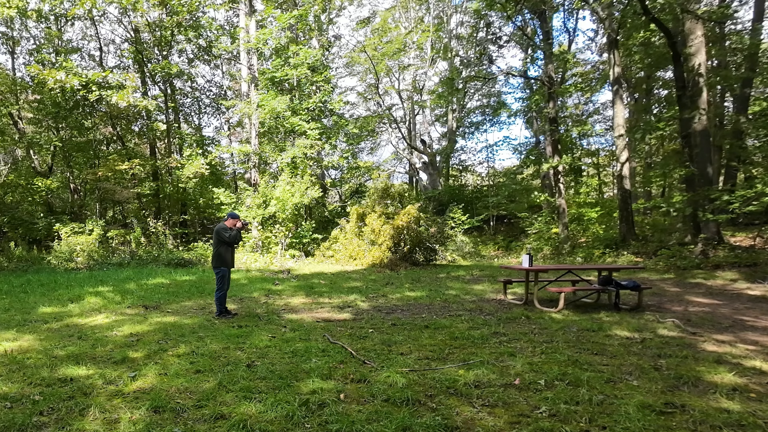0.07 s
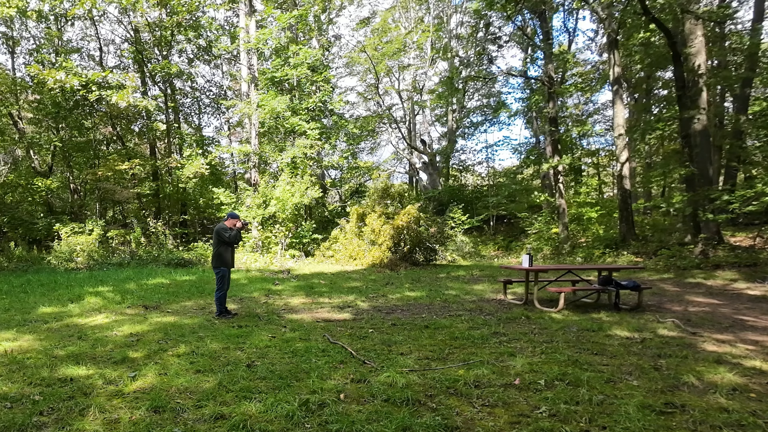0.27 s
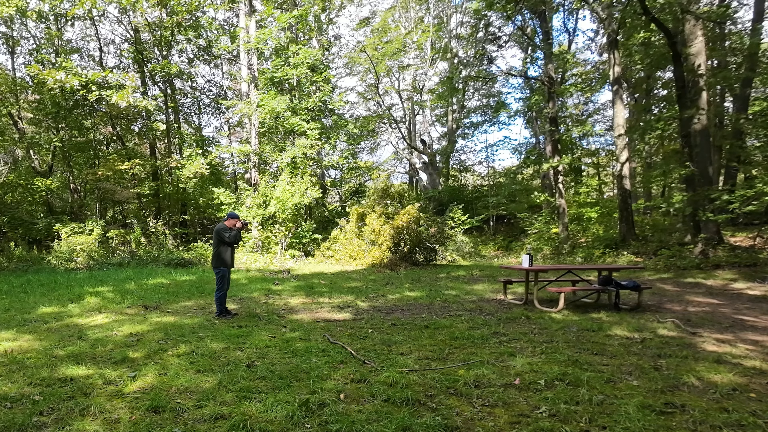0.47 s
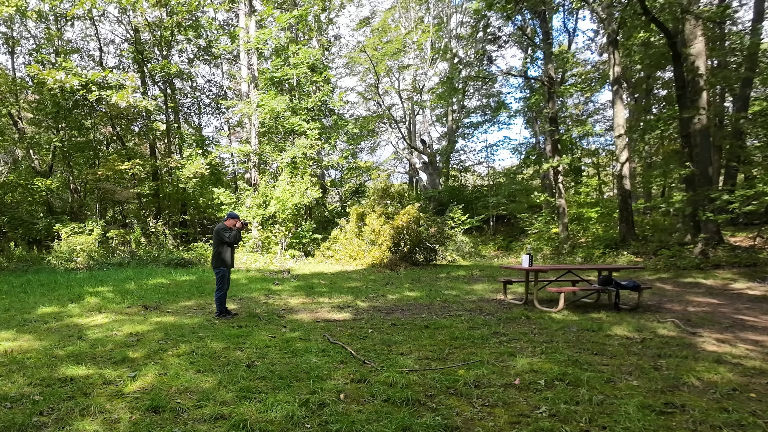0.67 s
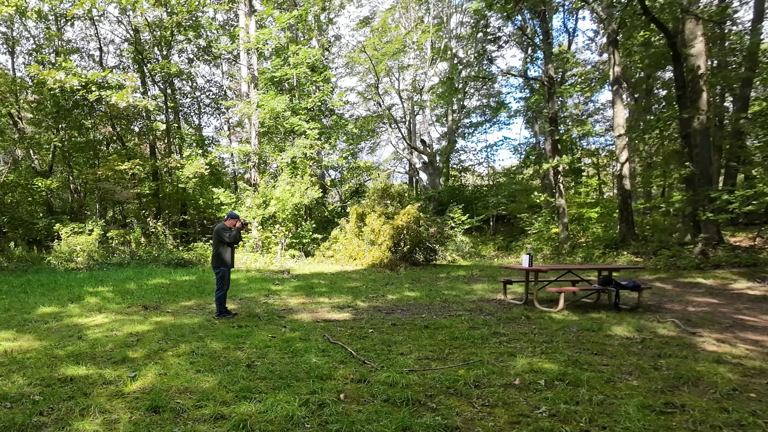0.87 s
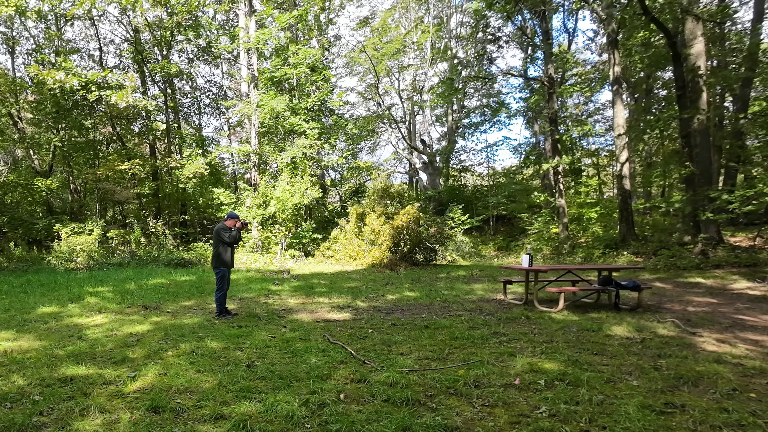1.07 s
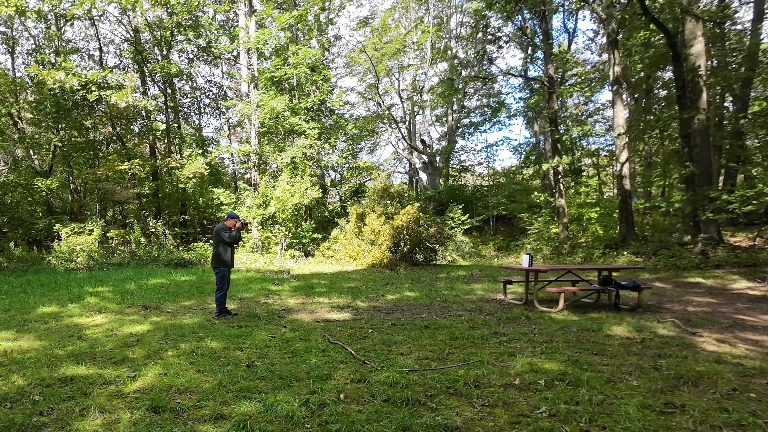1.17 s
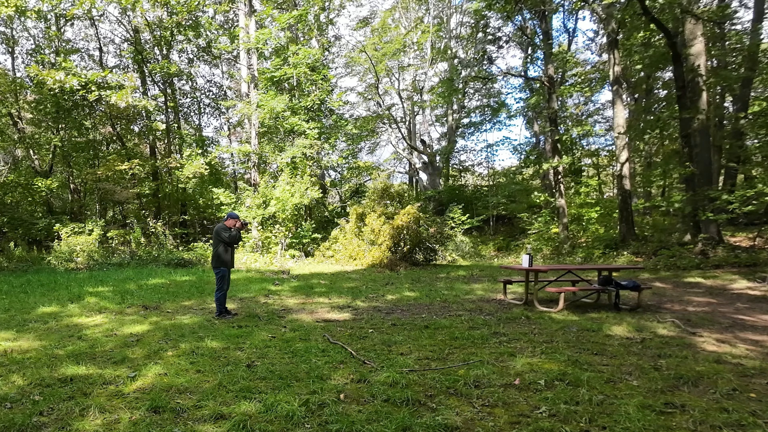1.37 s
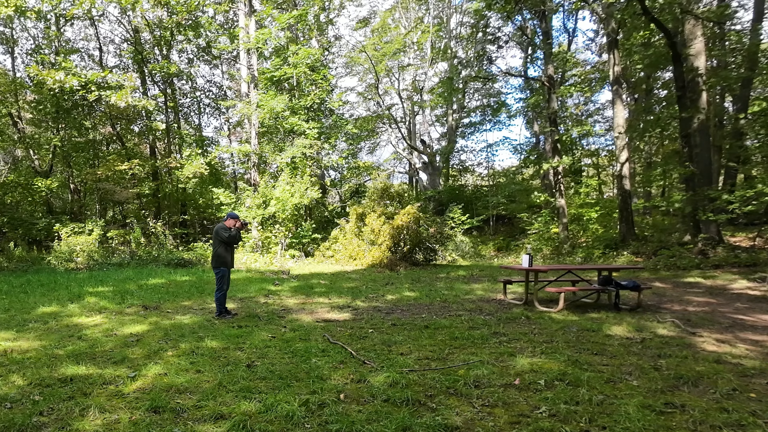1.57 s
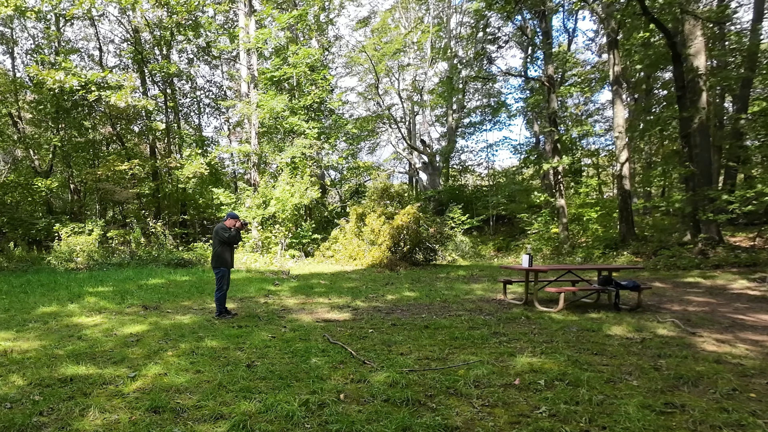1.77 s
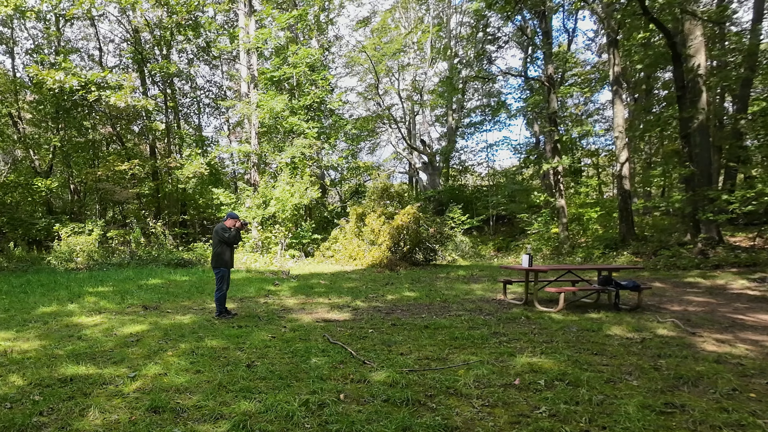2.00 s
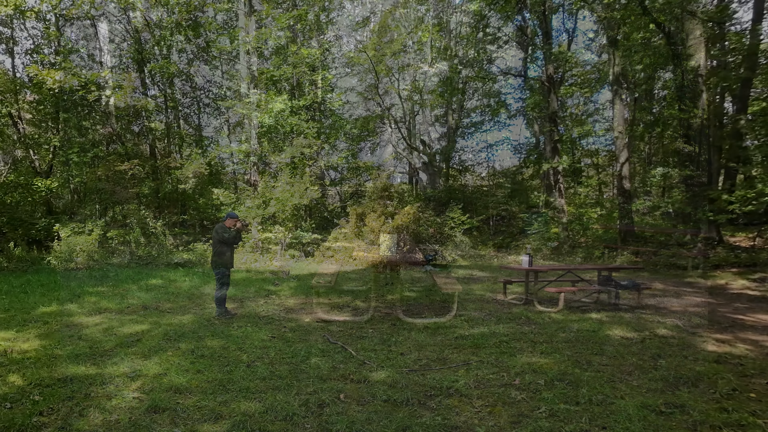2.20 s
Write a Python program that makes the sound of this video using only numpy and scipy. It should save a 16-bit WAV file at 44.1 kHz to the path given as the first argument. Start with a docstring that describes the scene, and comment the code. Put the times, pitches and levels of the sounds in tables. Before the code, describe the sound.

A reflex camera takes one picture with a quick two-part mechanical clack in a quiet clearing

```python
"""A quiet forest clearing under a low, barely wavering hush of air; early on, one faint tick in the undergrowth.
Then a reflex camera takes one picture: the mirror swings up, the shutter curtains snap, and the mirror rattles
back down. Gears are random ticks, impacts are puffs of noise, some led by very high treble, and the body rings
in decaying sines. The ground scatters the sound at once and the trees answer late and faintly; a soft low double
bump closes. An inverted reflection about a millisecond late at the microphone makes everything slightly hollow."""
import sys
import numpy as np
from scipy import signal
from scipy.fft import rfft, irfft, next_fast_len
from scipy.io import wavfile
from scipy.ndimage import map_coordinates

SR = 44100
rng = np.random.default_rng(int(sys.argv[2]) if len(sys.argv) > 2 else 0)


def to_wav(s):
    """Save 16-bit WAV."""
    ch = np.atleast_2d(s).T  # columns
    pcm = np.round(np.clip(ch, -1, 1) * 32767)  # PCM
    wavfile.write(sys.argv[1], SR, pcm.astype(np.int16))


N = 98695  # samples, about 2.24 s
ATTACK_S, SOFT_ATTACK_S = 0.00029, 0.00065  # rise of sharp ticks and snaps; of thuds, ringing and bumps


def amp(db):
    """Decibels to gain."""
    return 10 ** (np.asarray(db) / 20)


def unit(x):
    """Scale to rms 1."""
    return x / np.sqrt(np.mean(x ** 2) + 1e-20)


def along(points, hz):
    """Read (f/Hz, value) points on a log frequency axis."""
    f, v = np.transpose(points)
    return np.interp(np.log(hz + 1), np.log(f + 1), v)


def filtered(x, response):
    """Filter x by a complex response of frequency, padded to at least twice its length."""
    size = next_fast_len(2 * len(x))
    spectrum = rfft(x, size) * response(np.fft.rfftfreq(size, 1 / SR))
    return irfft(spectrum, size)[:len(x)]


def noise(colour, size):
    """Random-phase noise of rms 1; the colour sets only its relative spectrum."""
    hz = np.fft.rfftfreq(size, 1 / SR)
    phase = np.exp(2j * np.pi * rng.random(len(hz)))
    return unit(irfft(amp(along(colour, hz)) * phase, size))


def envelope(t, attack, t60):
    """A quick rise times an exponential fall of 60 dB in t60 seconds."""
    return (1 - np.exp(-t / attack)) * np.exp(-np.log(1000) * t / t60)


def burst(colour, attack, t60, size=4096):
    """A dying puff of coloured noise, its energy set by its envelope."""
    shape = envelope(np.arange(size) / SR, attack, t60)
    return unit(noise(colour, size) * shape) * np.sqrt(np.mean(shape ** 2)) / shape.max()


def add(track, s, sound):
    """Mix a sound into the track at time s."""
    part = track[round(s * SR):][:len(sound)]
    part += sound[:len(part)]


# colour of the air in the clearing: f/Hz, relative level/dB
AIR_COLOUR = [(20, 4), (45, -5), (80, 5), (130, 4), (180, 3), (250, -3), (500, -2), (850, 0), (1300, -5.5),
              (1800, -10.5), (2500, -12.5), (3500, -14.5), (4700, -18.5), (6500, -28), (9000, -31),
              (11500, -31.5), (15500, -35.5)]


def air():
    """A steady hush of outdoor air whose level drifts slowly and only slightly."""
    level_db, waver_db = -67, 0.78
    # smooth curve through random points
    waver = map_coordinates(rng.standard_normal(20), [np.linspace(1, 18, N)])
    return amp(level_db + waver_db * waver) * noise(AIR_COLOUR, N)


# small ticks in the undergrowth: t/s, level/dB
UNDERGROWTH_TICKS = [(.236, -67.5)]
# colour of such a tick: f/Hz, relative level/dB
UNDERGROWTH_COLOUR = [(500, -20), (1500, -3), (2600, 2.5), (4000, -16), (9000, -30)]


def undergrowth():
    """A faint tick in the undergrowth: a puff of noise, strongest in the middle range."""
    out = np.zeros(N)
    for s, db in UNDERGROWTH_TICKS:
        add(out, s, amp(db) * burst(UNDERGROWTH_COLOUR, ATTACK_S, t60=0.03))
    return out


# levers and gears running between the blows: t/s, level/dB, joined by straight lines
RATTLE_LEVEL = [(1.54, -67), (1.546, -53), (1.552, -51.5), (1.559, -45.5), (1.573, -43), (1.585, -47),
                (1.599, -44), (1.608, -52), (1.623, -37), (1.634, -48), (1.653, -41), (1.663, -35.5),
                (1.672, -44), (1.681, -44.5), (1.690, -42.5), (1.695, -68)]
# colour of the gears: f/Hz, relative level/dB
GEAR_COLOUR = [(100, -43), (280, -23), (370, -12.5), (520, -8.5), (760, -5), (950, 0), (1260, 4),
               (1550, -13), (2000, 0), (2450, 0.5), (3300, 0.5), (4500, -9.5), (8000, -11.5), (10000, -17),
               (14000, -18), (16000, -28)]


def rattle():
    """Dense tiny ticks of uneven size and random sign, coloured by the gears, while the mechanism runs."""
    ticks_per_s, spread_db = 1400, 3.5
    struck = rng.random(N) < ticks_per_s / SR
    sign = np.sign(rng.standard_normal(N))
    ticks = struck * sign * amp(spread_db * rng.standard_normal(N))
    gears = unit(filtered(ticks, lambda hz: amp(along(GEAR_COLOUR, hz))))
    s, db = np.transpose(RATTLE_LEVEL)
    level = np.interp(np.arange(N) / SR, s, db, left=-np.inf, right=-np.inf)  # silent outside the table
    return amp(level) * gears


# impacts in the mechanism: t/s, level/dB, thud and ring/dB, treble/dB, t60/s of snap and treble,
# relative pitch of the snap; thud and treble are relative, before the common trims in clacks()
IMPACTS = [(1.5435, -49.5, -9, -13, .012, 1.0), (1.5542, -28.5, -15.5, -1.5, 0.013, 1.15),
           (1.5644, -40.5, -5.5, -5, 0.0063, 1.1), (1.5947, -41.5, -6, -11, .02, 1.0),
           (1.6023, -31, -15, -5.5, 0.017, 1.0), (1.6113, -47.5, -5, -9, 0.0087, 1.0),
           (1.6171, -30, -4.5, 1, .014, 1.0), (1.622, -29, 1.5, 0.5, 0.02, .97),
           (1.6269, -44, 4, -6, 0.013, .95), (1.6410, -44, 1.5, 1, .014, 1.0),
           (1.6433, -29.5, -8.5, -6, 0.019, .95), (1.6546, -31, -9.5, -11, 0.015, 1.0),
           (1.6576, -36, -4, -6, 0.0097, 1.0), (1.6609, -44.5, -10, -2, 0.024, 1.0),
           (1.6705, -32.5, -8, -8, 0.018, 1.0), (1.6754, -38, 5.5, 7, 0.021, 1.0),
           (1.6830, -41.5, -1.5, 4, 0.012, 1.0), (1.6893, -37, -3.5, -8, 0.011, .95)]
# colours of the thud, the snap and the bright edge: f/Hz, relative level/dB
THUD_COLOUR = [(100, -33), (270, -30), (350, -20.5), (470, -9.5), (620, -1), (830, 10), (960, -6.5),
               (1120, 9), (1255, 3), (1450, -27), (2200, -3.5), (5000, -59)]
SNAP_COLOUR = [(300, -36), (1000, -36), (1800, -14), (2200, 11), (2500, -5), (2900, 7), (3500, 0),
               (4500, -9.5), (6000, -11.5), (15000, -43)]
TREBLE_COLOUR = [(1500, -26), (4000, 1.5), (5600, -3.5), (6600, -6), (7800, -0.5), (8900, 2), (9500, -8.5),
                 (12000, -5), (14000, -33), (16000, -12)]
# ringing of the camera body: f/Hz, relative level/dB (varied at each impact), t60/s
BODY_MODES = [(604, -21.5, 0.091), (738, -22, 0.055), (843, -18, .04), (1245, 0.5, 0.041),
              (2494, -8, 0.051), (2720, -23, 0.039), (3320, -14, 0.028), (4740, -17, 0.038),
              (7870, -16, .02)]


def body_ring(size):
    """The struck camera body: decaying sines, phases wholly random and levels slightly varied at each blow."""
    t = np.arange(size) / SR
    ring = np.zeros(size)
    for hz, level, t60 in BODY_MODES:
        gain = amp(level + rng.normal(0, 1))
        sine = np.sin(2 * np.pi * (hz * t + rng.random()))
        ring += gain * envelope(t, SOFT_ATTACK_S, t60) * sine
    return ring


def clacks():
    """Each impact gives a hard snap and a bright edge, with its own share of thud and body ring."""
    treble_trim_db, ring_trim_db, thud_gain = -5.5, -3, 0.46
    out = np.zeros(N)
    for s, db, thud_db, treble_db, t60, pitch in IMPACTS:
        snap = burst(np.array(SNAP_COLOUR) * [pitch, 1], ATTACK_S, t60)
        edge = amp(treble_trim_db + treble_db) * burst(TREBLE_COLOUR, ATTACK_S, t60)
        thud = burst(THUD_COLOUR, SOFT_ATTACK_S, t60=0.024)
        body = thud_gain * thud + amp(ring_trim_db) * body_ring(len(thud))
        add(out, s, amp(db) * (snap + edge + amp(thud_db) * body))
    return out


# earliest treble of some blows, about 2.4 ms ahead of them: t/s, level/dB
TREBLE_LEADS = [(1.5517, -45.5), (1.6003, -43.5), (1.6143, -54), (1.6192, -41), (1.6408, -49.5),
                (1.687, -52)]
# colour of this early treble: f/Hz, relative level/dB
LEAD_COLOUR = [(4000, -38), (9000, -17), (10500, 5), (13500, -2), (15000, -2), (16000, -19.5)]


def treble_leads():
    """Very high, thin noise puffs, the earliest treble of some blows, about 2.4 ms ahead."""
    out = np.zeros(N)
    for s, db in TREBLE_LEADS:
        add(out, s, amp(db) * burst(LEAD_COLOUR, ATTACK_S, t60=0.018))
    return out


# colours of the scatter from the ground and of the wash from the trees: f/Hz, relative level/dB
GROUND_COLOUR = [(200, -3), (1200, 0), (3000, -7), (6000, -9), (15000, -18.5)]
TREES_COLOUR = [(200, -7), (800, -2.5), (1230, 3), (1600, -14), (2200, -12), (4000, -17.5), (12000, -22)]


def clearing(x):
    """Convolution with decaying noise: a short scatter from the ground, a faint late wash from the trees."""
    ground_db, trees_db = -21, -39.5
    trees_delay_s = 0.024  # about 8 m of extra path
    t = np.arange(SR) / SR
    ground = noise(GROUND_COLOUR, SR) * envelope(t, attack=0.0038, t60=0.091)
    late = np.maximum(t - trees_delay_s, 0)
    trees = noise(TREES_COLOUR, SR) * envelope(late, attack=0.13, t60=1.37)
    # each part has energy 1 before its level
    answer = amp(ground_db) * ground / np.linalg.norm(ground)
    answer += amp(trees_db) * trees / np.linalg.norm(trees)
    return signal.fftconvolve(x, answer)[:N]


# soft low bumps: t/s, level/dB
BUMP_TIMES = [(2.1178, -59), (2.132, -59.5)]
# colour of a bump: f/Hz, relative level/dB
BUMP_COLOUR = [(40, -13), (130, 16), (300, -6), (600, -6.5), (1500, -20), (4000, -45)]


def bumps():
    """A soft double bump: two low puffs of noise close together."""
    out = np.zeros(N)
    for s, db in BUMP_TIMES:
        add(out, s, amp(db) * burst(BUMP_COLOUR, SOFT_ATTACK_S, t60=0.052))
    return out


def scene():
    """The camera in the clearing, before the microphone; only the camera gets an answer."""
    background = air() + undergrowth() + bumps()
    camera = rattle() + clacks() + treble_leads()
    return (camera + clearing(camera) + background)[None]


# close reflection at the microphone: f/Hz, strength relative to the direct sound
REFLECTION_STRENGTH = [(30, 0.71), (1000, 0.52), (3000, 0.54), (7000, 0.59), (9500, 0.41), (12000, 0.087),
                       (16000, .05)]


def record(dry):
    """An inverted close reflection cuts evenly spaced notches; nothing passes above the band limit."""
    delay_s, top_hz = 0.000975, 15800  # the delay is about 0.33 m of extra path

    def microphone(hz):
        """Direct sound minus its delayed copy, evened out in power."""
        strength = np.clip(along(REFLECTION_STRENGTH, hz), 0, 1)
        comb = 1 - strength * np.exp(-2j * np.pi * hz * delay_s)
        return comb / np.sqrt(1 + strength ** 2) * (hz < top_hz)

    return filtered(dry[0], microphone)[None]


dry = scene()
out = record(dry)
to_wav(out)
```